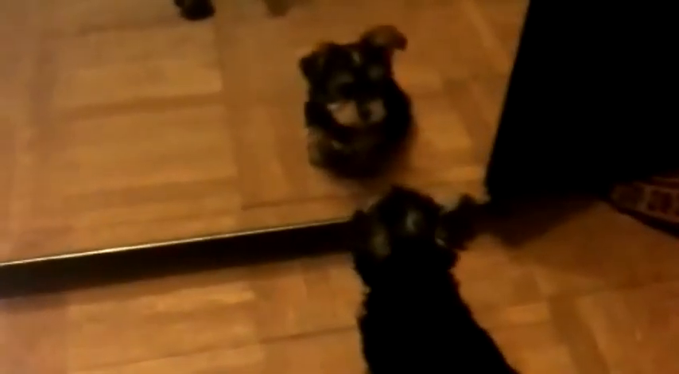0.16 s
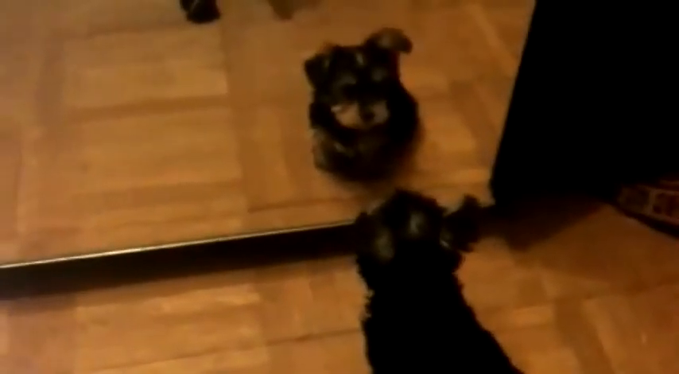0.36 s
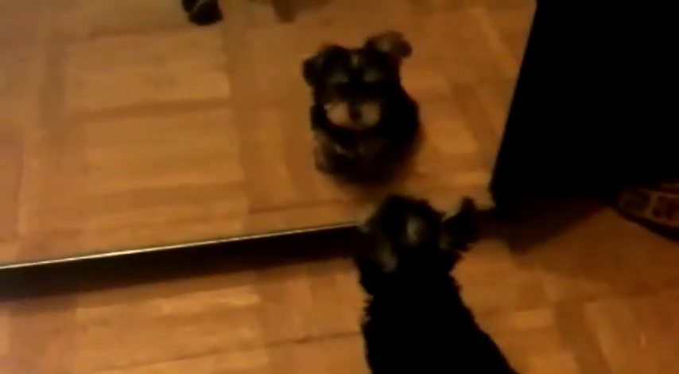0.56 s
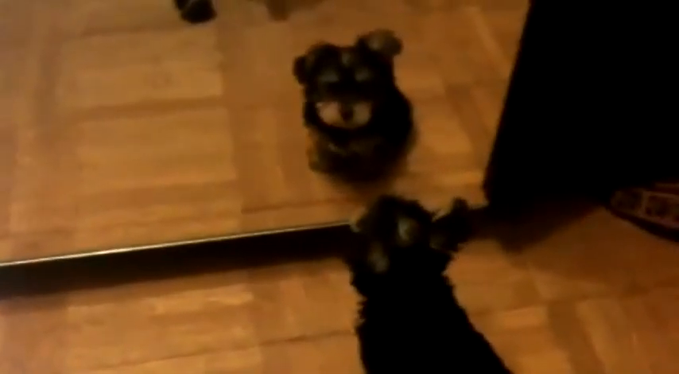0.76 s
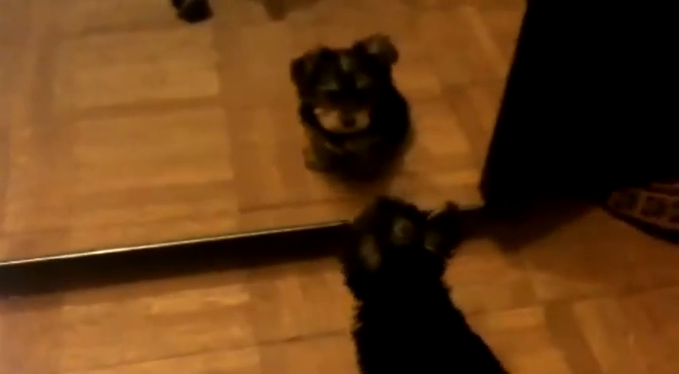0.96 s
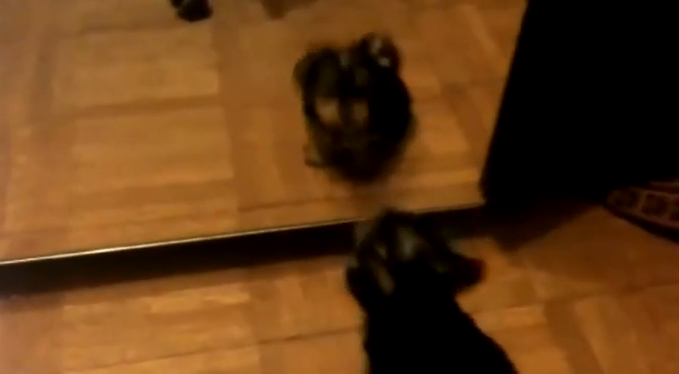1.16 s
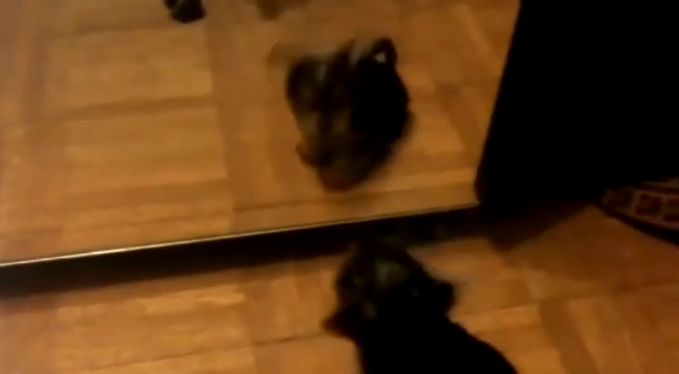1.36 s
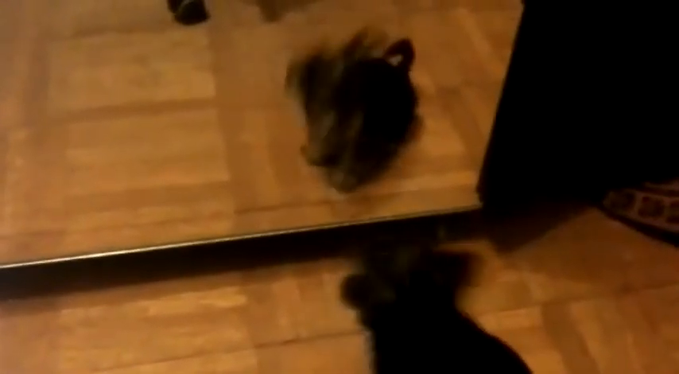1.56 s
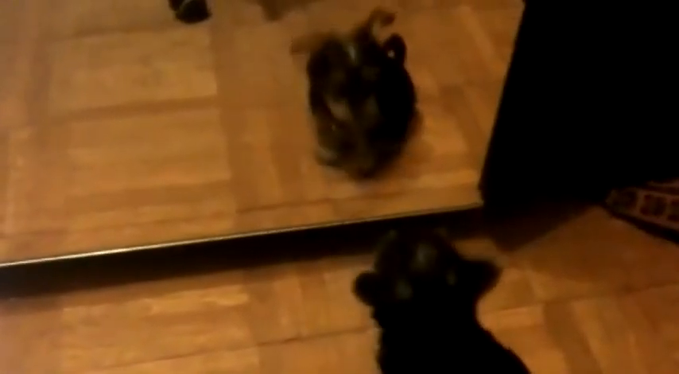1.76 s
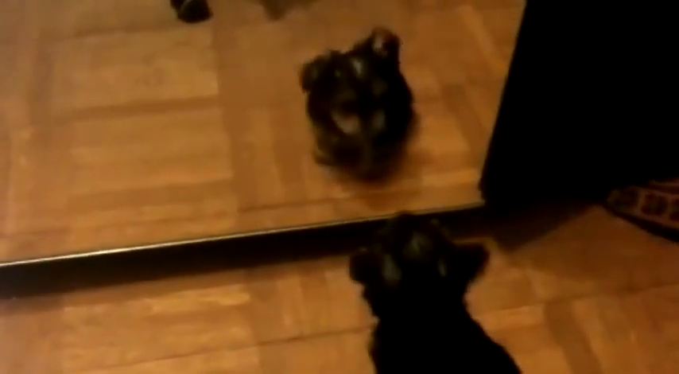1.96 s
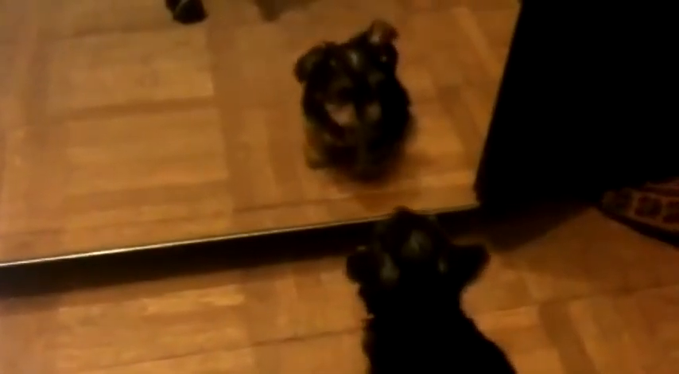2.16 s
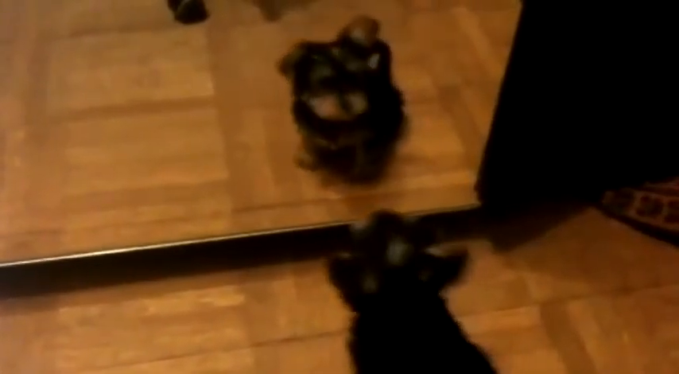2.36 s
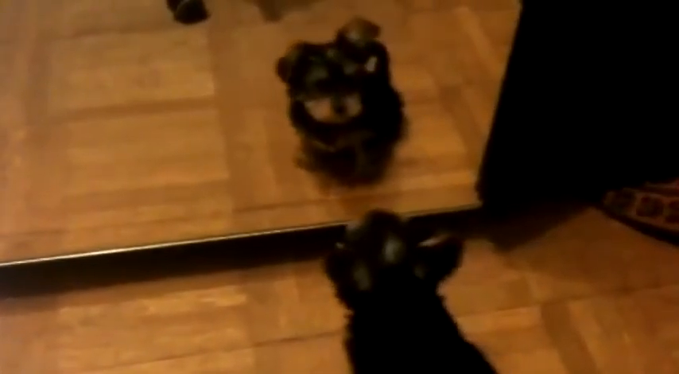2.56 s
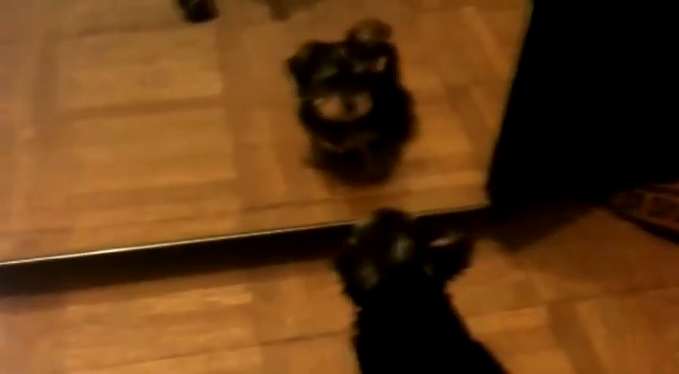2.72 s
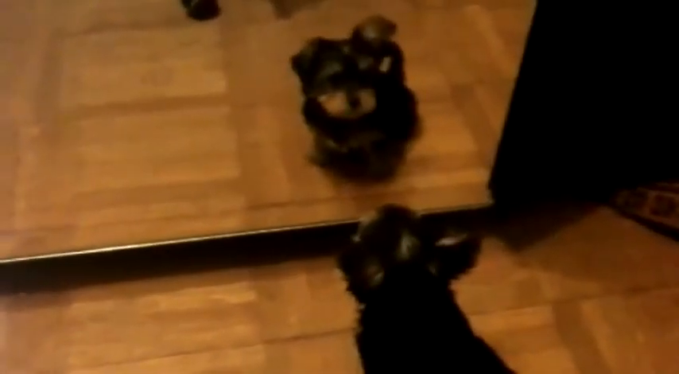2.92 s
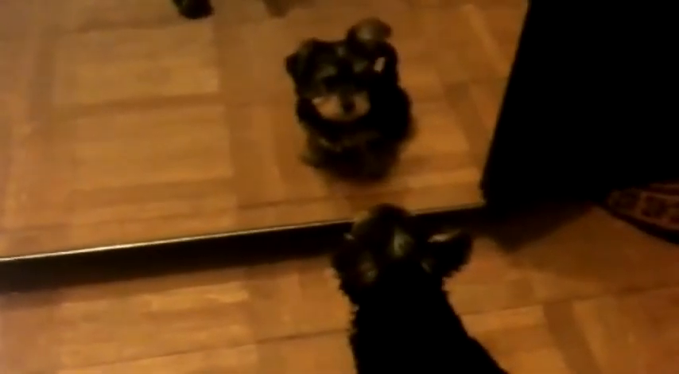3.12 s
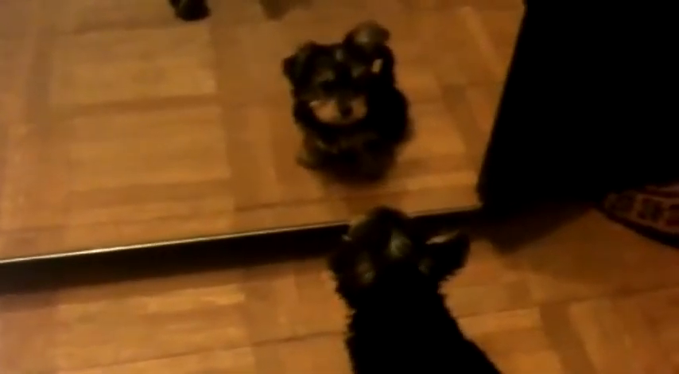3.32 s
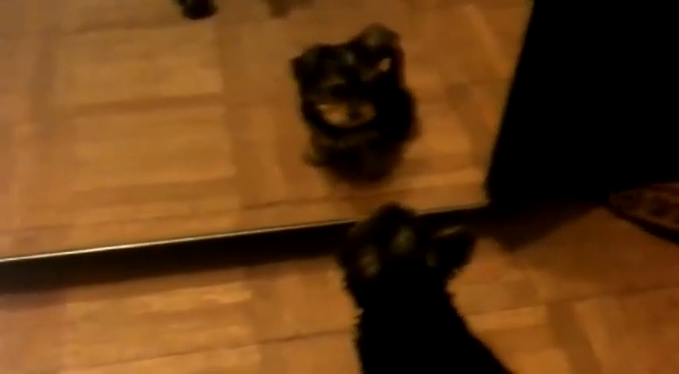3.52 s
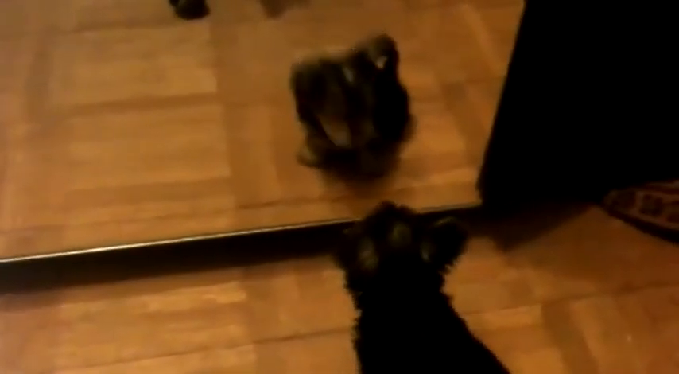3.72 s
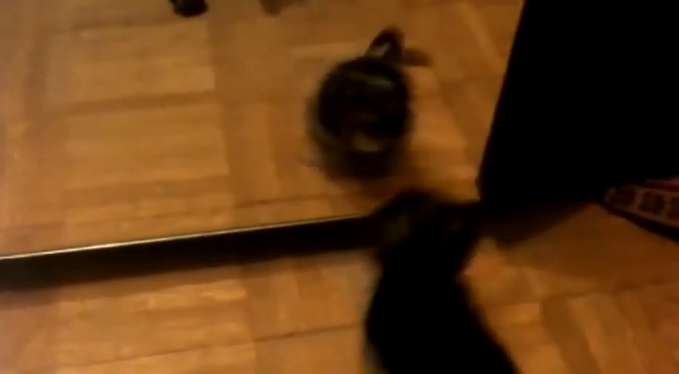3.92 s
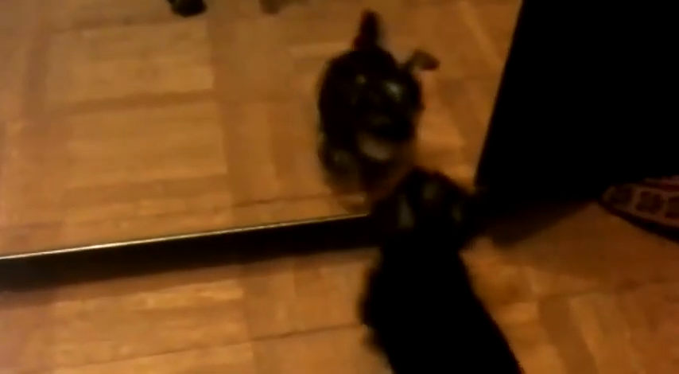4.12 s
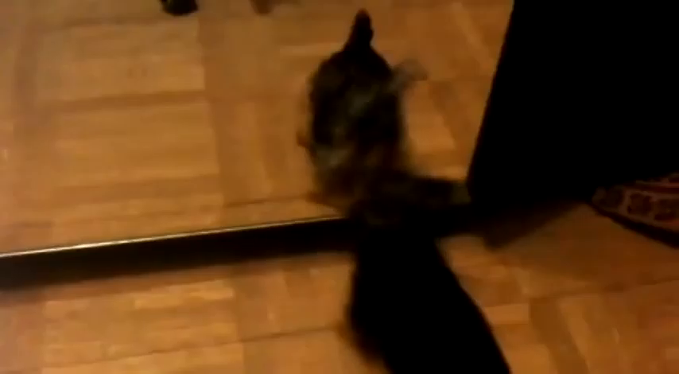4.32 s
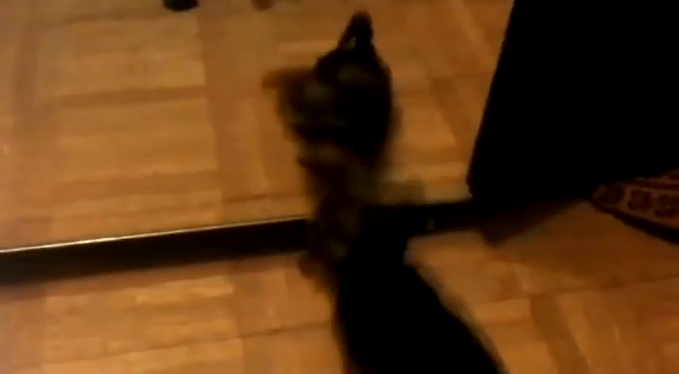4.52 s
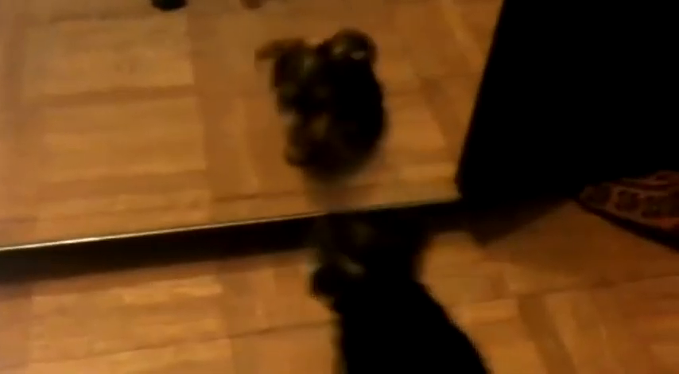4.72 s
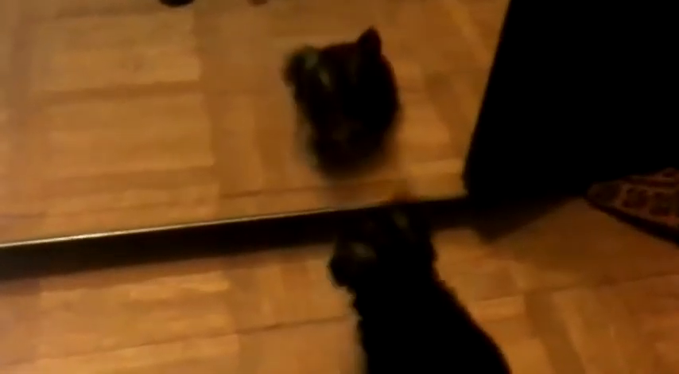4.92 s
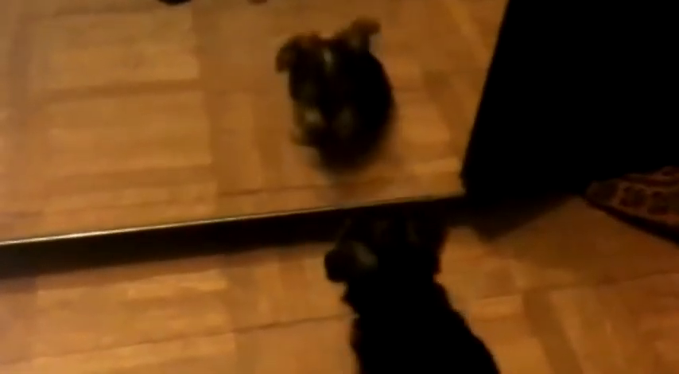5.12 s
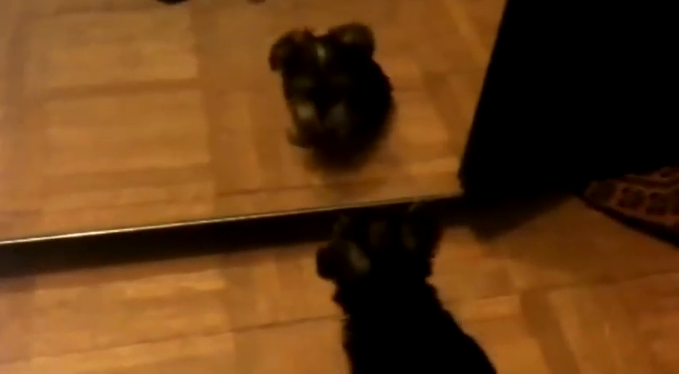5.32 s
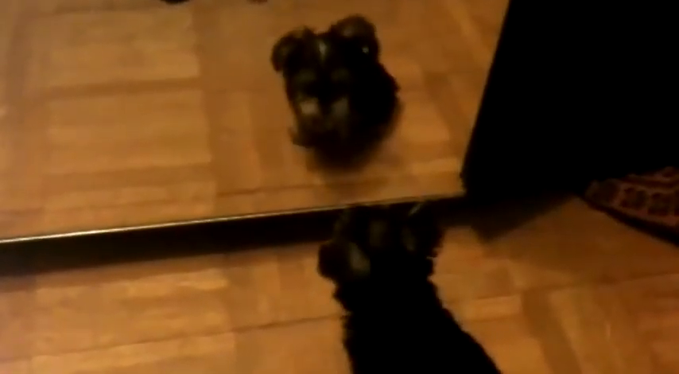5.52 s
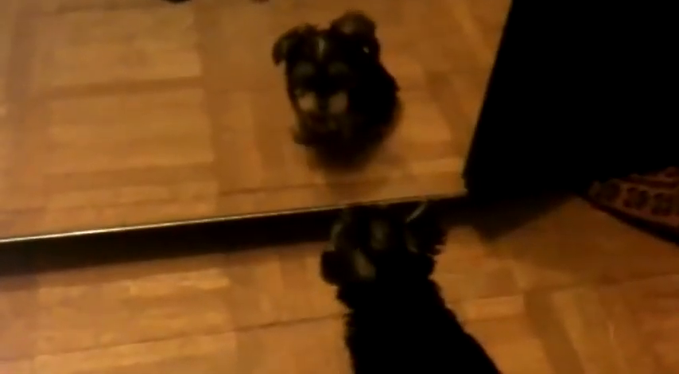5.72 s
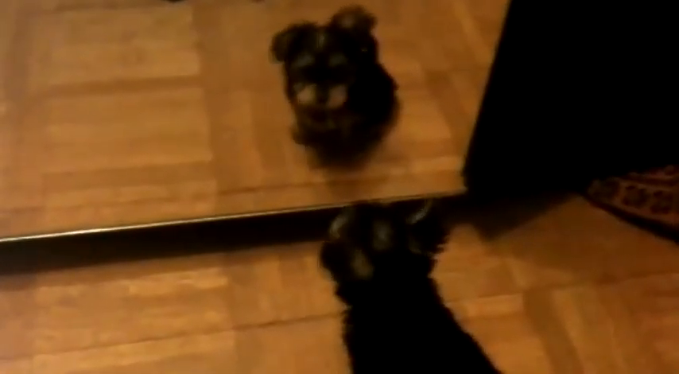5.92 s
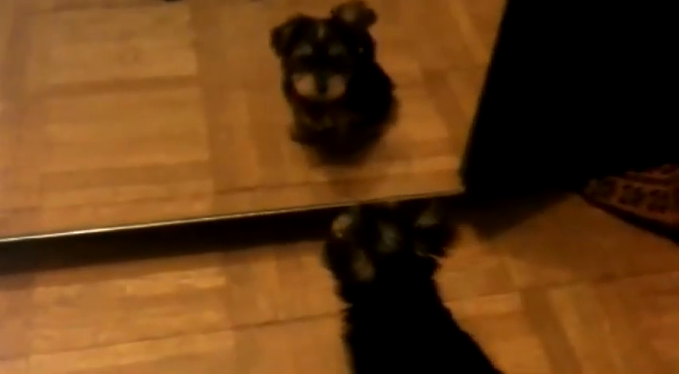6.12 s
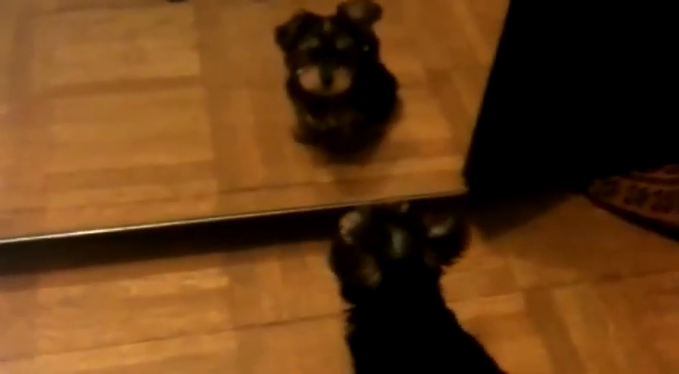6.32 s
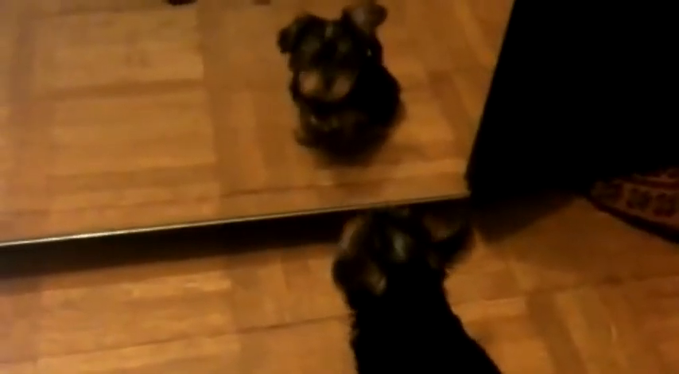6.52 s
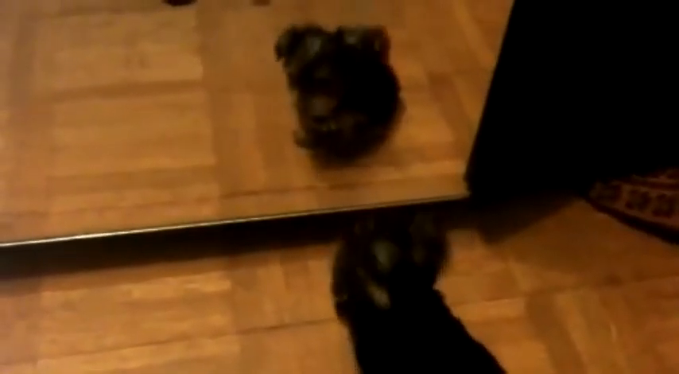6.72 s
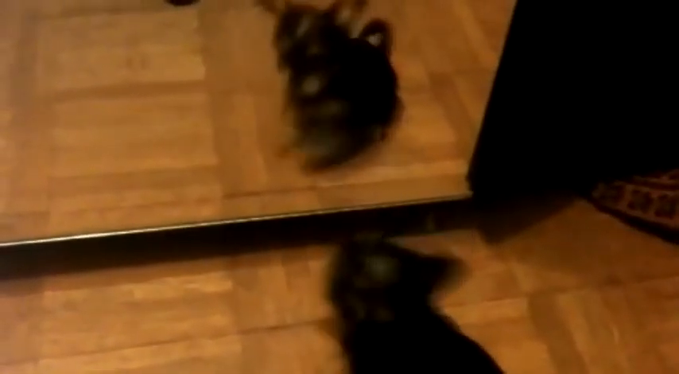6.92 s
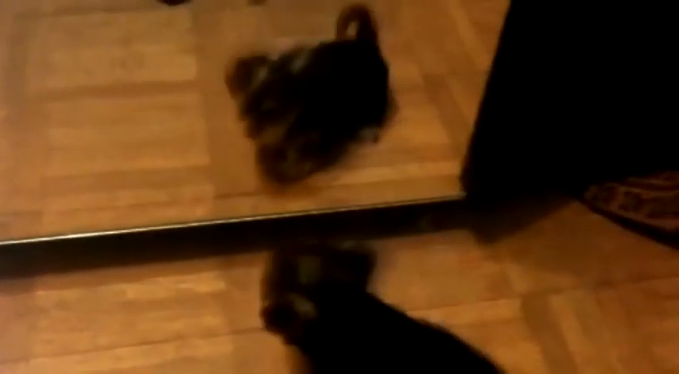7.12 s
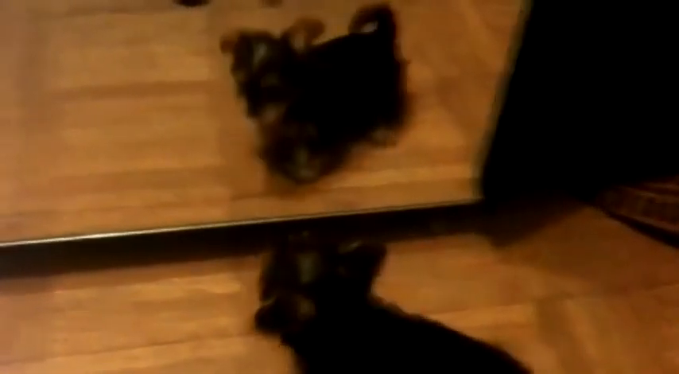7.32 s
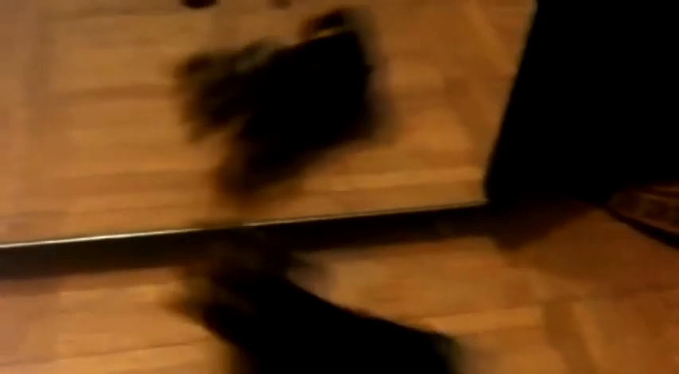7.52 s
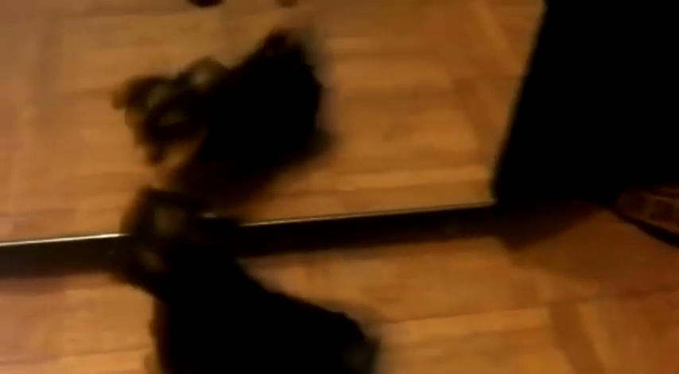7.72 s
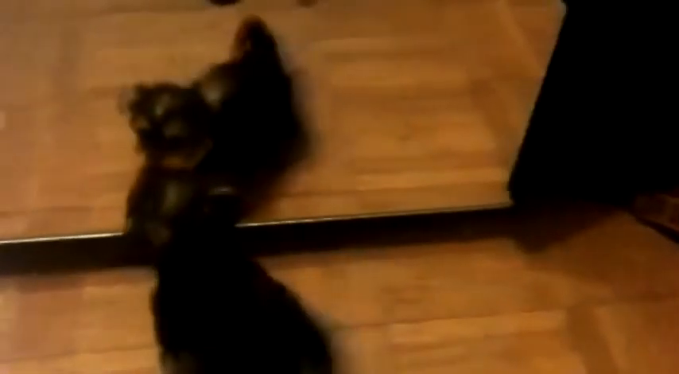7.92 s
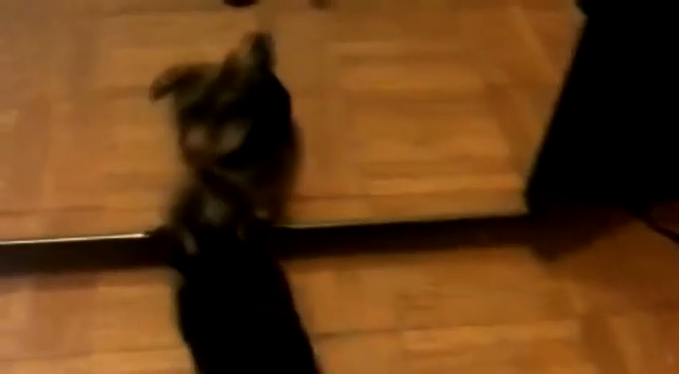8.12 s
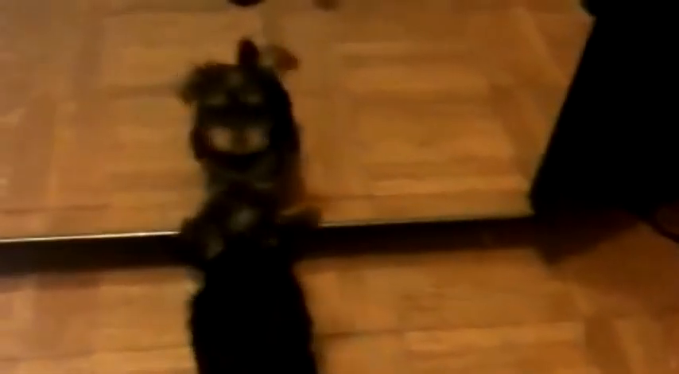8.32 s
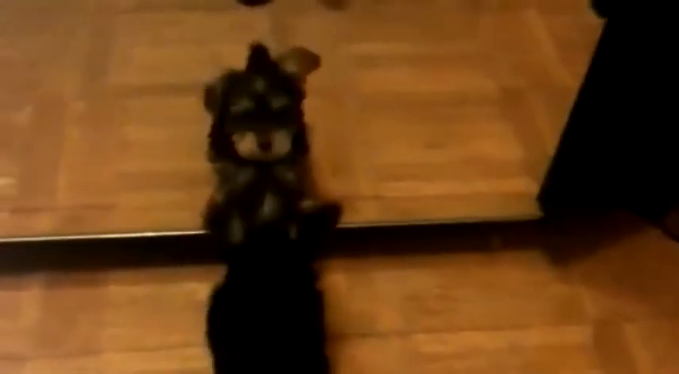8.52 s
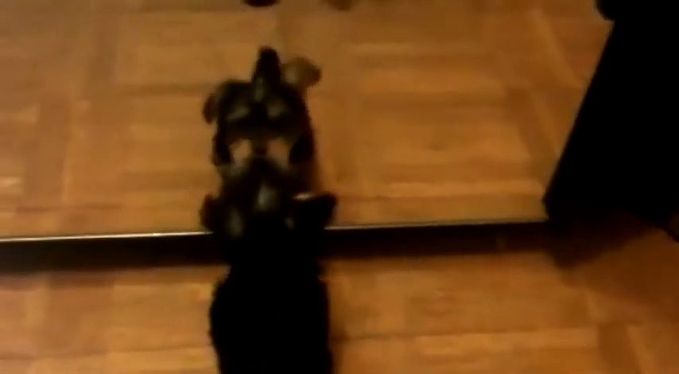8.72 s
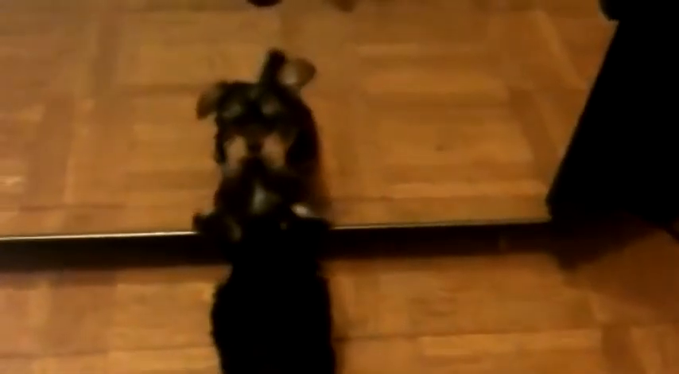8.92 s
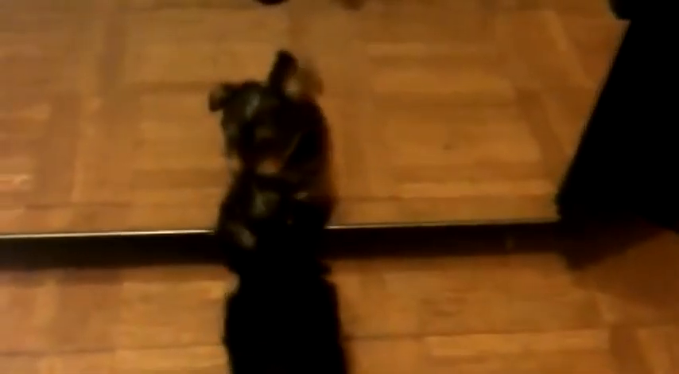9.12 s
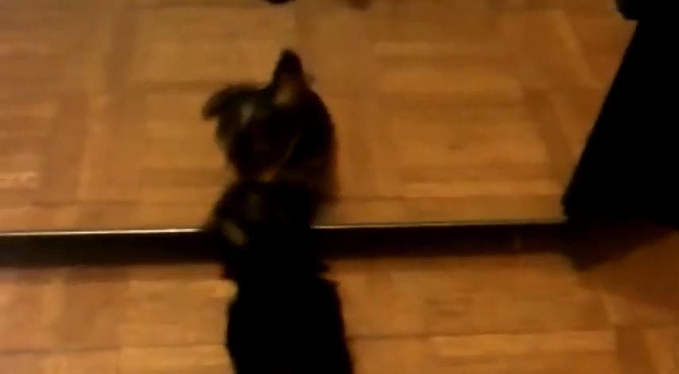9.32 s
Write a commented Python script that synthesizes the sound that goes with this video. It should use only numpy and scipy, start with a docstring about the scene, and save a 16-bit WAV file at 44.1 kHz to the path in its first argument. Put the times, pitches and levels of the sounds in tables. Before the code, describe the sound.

A small puppy gives short high yips, squeaks and nasal whines in bursts, with one loud sharp yap, in an echoing wooden-floored room.

```python
"""A small puppy yips and whines at another dog, over the wooden floor of a live room, with one loud yap.
Each note is a near-pure high sine with weaker overtones and a rasp of air; squeaks fall quickly in pitch.
Around the yips, shaped noise hisses through the nose and thin swept sines whistle above it.
Paws thud softly three times as decaying low sines. Echoes of the room follow the dog; an appliance's
wavering tones and steady room noise lie underneath, without added echo."""
import sys
import numpy as np
from scipy import signal
from scipy.fft import rfft, irfft, next_fast_len
from scipy.io import wavfile
from scipy.ndimage import uniform_filter1d

SR = 44100
rng = np.random.default_rng(int(sys.argv[2]) if len(sys.argv) > 2 else 0)


def pcm_store(signal):
    """Save signal as 16-bit PCM."""
    levels = np.round(np.clip(np.atleast_2d(signal), -1, 1) * 32767)
    wavfile.write(sys.argv[1], SR, levels.astype(np.int16).T)


N = 412776

# Steady tones of the appliance: f/Hz, relative level/dB
HUM_TONES = [(199.2, -64.5), (274.5, -64), (333.8, -61), (382.2, -66), (511.4, -62.5), (667.5, -75),
             (791.3, -70.5), (904.4, -72.5), (1017, -69.5)]
# Colour of the room noise: f/Hz, relative density/dB per Hz
ROOM_NOISE = [(18, -89), (30, -53), (123, -13.5), (197, 2), (225, -5), (277, 3.5), (299, -10), (324, -6),
              (359, -8), (505, -3.5), (546, -10.5), (1020, -11.5), (1440, -12.5), (1680, -16), (15500, -29)]
# Nose whistles: start t/s, length t/s, first f/Hz, last f/Hz, peak level/dB
WHISTLES = [(.293, .04, 14150, 15000, -55), (1.057, .045, 12200, 13800, -56.5),
            (1.354, .03, 12000, 13300, -55), (2.188, .12, 13950, 13050, -50),
            (2.765, .15, 13100, 12700, -50), (3.376, .09, 12700, 13600, -52),
            (3.766, .04, 12000, 12500, -54), (3.84, .08, 14100, 13650, -50.5),
            (4.46, .036, 11250, 12050, -50.5), (4.914, .044, 12000, 13150, -53),
            (6.39, .086, 13000, 14300, -56)]
# Whimpers of air through the nose: strongest t/s, length of the swell t/s, level at the strongest/dB
WHIMPERS = [(.47, 0.087, -54.5), (1.15, 0.052, -48.5), (1.54, 0.22, -54), (1.88, 0.21, -50.5),
            (2.29, 0.22, -52), (2.86, 0.4, -57.5), (3.401, 0.092, -52), (3.9, 0.13, -55), (4.23, 0.17, -52),
            (4.631, 0.17, -49), (5.05, 0.18, -51.5), (5.56, 0.27, -54.5), (6.42, 0.23, -56),
            (7.24, 0.26, -56.5), (7.57, 0.17, -49.5), (7.93, 0.21, -51.5), (8.2, 0.045, -53),
            (9.13, 0.095, -62)]
# Colour of the nose air: f/Hz, relative density/dB per Hz
NOSE_AIR = [(1000, -15.5), (2800, -7), (3900, -47.5), (5000, -3.5), (7000, -8), (8400, 5), (9200, 2),
            (10300, -1.5), (11200, 1.5), (12100, -7), (13200, -8.5), (14300, -13.5), (15500, -66.5)]
# How throat and mouth pass the overtones, and the colour of the rasp: f/Hz, gain/dB
THROAT = [(1700, 2), (2200, -5.5), (2700, -24), (3300, -17), (3800, -28.5), (4300, -16), (4700, -16),
          (5300, -16), (6100, -18.5), (6900, -25), (7600, -22.5), (8400, -13.5), (9200, -18.5),
          (10100, -28), (11200, -30.5), (14000, -38.5)]
# Colour of the hoarse air in a broken voice: f/Hz, relative density/dB per Hz
HOARSE_AIR = [(1500, -34.5), (3000, -6), (3600, -4.5), (4300, 2), (5000, -1), (5600, -16), (6500, 1),
              (8600, -1.5), (10200, -10.5), (14000, -15)]
# Sharp yaps and bending whines, one curve each:
# t/s, f/Hz, level/dB, overtones/dB, open mouth/dB, roughness/0-1
SWOOPS = [
    [(1.101, 2610, -40, 0, 0, 0.27), (1.113, 2502, -26, 8, -1, 0.2), (1.122, 2518, -14.5, -5.5, 13.5, 0.02),
     (1.133, 2541, -19.5, -6, 17, 0.38), (1.145, 2720, -30.5, 0.5, 20, 0.37),
     (1.158, 2654, -17.5, -15, 16, 0), (1.170, 2500, -33, -5, 10, 0.1)],
    [(1.384, 2550, -15, -14, 10, 0.05), (1.392, 2380, -13.5, -1.5, 18, 0), (1.400, 2240, -19.5, 5, 12, 0.1),
     (1.408, 2334, -13, -2, 8.5, 0.1), (1.418, 2483, -10, -11.5, 14.5, 0), (1.428, 2650, -38, -9, 15, 0.42),
     (1.440, 2607, -26, -5, 4, 0.14), (1.485, 2602, -37.5, 11, 1, 0), (1.530, 2610, -48, 15.5, 5, 0),
     (1.552, 2480, -43, 9, 5, 0.1)],
    [(2.279, 1980, -31, -8, 0, .4), (2.288, 1930, -34, -13, 2, 0), (2.298, 1873, -23.5, -21, 6, 0),
     (2.305, 1832, -19.5, -16.5, 15, 0.3), (2.310, 1530, -33, -14, 0, .4), (2.316, 1370, -46, -16, 0, 0.5)],
    [(4.521, 2027, -16, -15, 0, 0), (4.545, 1940, -20.5, -11, -8, 0.02), (4.585, 1853, -20.5, -8, 12, 0),
     (4.626, 1856, -25, -11, 0, 0), (4.645, 1723, -21, -11, 15, .02), (4.658, 1610, -26, -9, 12, .05),
     (4.672, 1320, -34, -26, -7, .2)],
    [(4.954, 2050, -25, -5, 0, 0.56), (4.966, 1808, -32.5, 3, 4, 0.25),
     (4.980, 1700, -31.5, 3.5, 13.5, 0.2), (5.001, 1932, -30.5, 2, 3, 0.07), (5.033, 1867, -30.5, -3, 1, 0),
     (5.047, 1665, -33.5, -3, 1, 0.35), (5.060, 1613, -29, -7, 3.5, 0.25), (5.075, 1325, -35, -8, -1, .3)],
    [(5.450, 1510, -48, 0, 0, .2), (5.463, 1598, -34.5, -1, -2, 0), (5.484, 1585, -32.5, -5, 2, 0),
     (5.497, 1315, -24, -10, 3, .1), (5.530, 1263, -25, -9.5, -5, 0.14), (5.558, 1214, -29, -5.5, 1, .05),
     (5.585, 1216, -33, -5.5, -5, 0), (5.600, 1130, -43, 0, -4, 0.35)],
    [(6.747, 2090, -17, 1, 8, 0.42), (6.756, 2023, -4, -9, 8, 0), (6.768, 2077, -9, -11, 11, 0.07),
     (6.777, 2208, -19, 7.5, 4, 0.62), (6.784, 2338, -17, -4, 13.5, 0.48),
     (6.796, 2482, -14, -9.5, 11.5, 0.31), (6.809, 2498, -26, -14, 8, 0.46),
     (6.835, 2432, -32.5, -1, 14, 0.62), (6.880, 2314, -39.5, 2, 7, 0.76)],
    [(7.126, 2400, -42, 5, 3, 0.4), (7.149, 2130, -23.5, -6, 2, 0.25), (7.168, 2388, -33, -2.5, 6, 0.33),
     (7.205, 2308, -29, -7, 6, 0.3), (7.235, 2247, -33.5, -6, 8, 0.46), (7.249, 2160, -36, -2, 2, 0.4)],
    [(7.463, 2203, -36, 4, 8, .3), (7.477, 2220, -28, -9, 10, 0.25), (7.491, 2090, -20.5, -5, 8, 0.14),
     (7.501, 2119, -16.5, -12, 18.5, 0), (7.513, 2218, -25.5, -6.5, 15.5, 0.02),
     (7.530, 2193, -33, -10, 10, 0.13), (7.549, 2140, -32, -8, 8, .4)],
    [(7.818, 1805, -47, 11, -1, 0.7), (7.831, 1725, -23, -13, 12, 0.36),
     (7.885, 1706, -24, -12.5, 14.5, 0.02), (7.915, 1637, -27.5, -13, 13, 0.11),
     (7.952, 1604, -32, -4, 15, .15)],
    [(8.155, 1266, -28, -20, 0, 0.6), (8.165, 1118, -27, -19, 5, 0.6), (8.177, 1072, -22, -13, 11.5, 0),
     (8.195, 1077, -22.5, -18, 3, 0.05), (8.218, 1139, -34.5, -7, -4, 0.46),
     (8.245, 1081, -32, -15, -4, 0.4), (8.265, 1083, -41, -9, -4, .4), (8.277, 1045, -36, -3, 0, .9),
     (8.289, 1010, -46, -10, 0, .6)],
]
# Squeaks, quick drops in pitch:
# start t/s, length t/s, first f/Hz, drop/octaves, level/dB, overtones/dB, open mouth/dB
SQUEAKS = [ (1.166, 0.024, 2280, 0.42, -26, -19, 0), (1.552, 0.021, 1960, 0.46, -25.5, -17, 6),
           (1.875, 0.028, 2018, 0.5, -19.5, -15, 6.5), (2.874, 0.016, 1625, 0.43, -40.5, -19, 2),
           (3.908, 0.011, 1670, 0.36, -37.5, -6, 1), (4.248, 0.019, 1965, 0.57, -25, -13, -1),
           (6.42, 0.047, 1764, 0.2, -52.5, -11, 2), (6.89, 0.021, 2010, 0.33, -36, -10, -4),
           (7.246, 0.023, 1873, 0.4, -23.5, -11, 3), (7.545, 0.031, 1920, 0.31, -19.5, -10.5, 7),
           (7.951, 0.023, 1544, 0.35, -31.5, -6, -6), (8.31, 0.013, 887, 0.21, -30, -20, -6),
           (9.126, 0.022, 1312, 0.356, -36.5, -3.5, -7), ]
# Plain held notes: start t/s, length t/s, attack t/s, first f/Hz, last f/Hz, level/dB,
# level change along the note/dB, height of the opening push t/s after the start,
# sag of its pitch/0-1, its gain/dB, overtones/dB, open mouth/dB
CRIES = [ (1.761, 0.12, 0.012, 2140, 2120, -25, -6, 0.03, 0.03, 4.5, -2, 9),
         (4.136, 0.099, 0.023, 2550, 2347, -43, 7, 0.025, 0.08, 8.5, 4, 3.5),
         (4.494, 0.062, 0.0098, 2300, 2170, -46, -11, 0.023, 0.05, 9, 10.5, -6),
         (7.965, 0.041, 0.0037, 1693, 1716, -33.5, 7, 0.009, 0.05, -1.5, -13.5, -13),
         (8.296, 0.029, 0.0038, 952, 915, -28.5, -10, 0.0046, 0.01, 0, -15.5, 4), ]
# Paws landing on the floor: t/s, level before the soft rise/dB, thud f/Hz
PAWS = [(4.327, -31, 188), (7.936, -38, 176), (8.098, -39, 159)]
# How long the room rings: f/Hz, decay by 60 dB t/s
RING = [(200, 0.6), (1200, 0.4), (1750, 0.46), (2300, 0.53), (5000, 0.38), (9000, 0.32), (15000, 0.057)]

EDGE_HZ = 15600  # upper band limit
MOUTH_HZ, MOUTH_WIDTH_HZ = 4970, 850  # resonance of the open mouth
WHIMPER_FALL_S = 0.0662
RELEASE_S = 0.0042  # closing ramp of a cry, both ramps of a swoop
PUSH_END_S = 0.039  # the push has eased well off by this time into the cry
PUSH_SHARPNESS = 2.7  # its loudness goes sooner than its sag
OVERTONE_SHARE = 0.99  # the overtones follow this share of a cry's changes in dB
LEVEL_CURVE = 0.97  # exponent: the level of a cry changes almost evenly in dB
SCOOP, SCOOP_S = 0.0693, 0.0036  # a cry starts sharp by this share and falls into its note
DROOP, DROOP_S = 0.0505, 0.0115  # its pitch droops by this share as it runs out
DROP_CURVE = 2.1  # the drop of a squeak speeds up as the breath gives out
SQUEAK_ARCH = 1.6  # how pointed its swell is
CRY_ROUGH, SQUEAK_ROUGH = .15, .35  # roughness 0-1
HOARSE_CURVE = 1.7  # a slightly rough voice stays clear; hoarse air comes in as it really breaks


def gain_of(db):
    """Decibels to a factor."""
    return 10 ** (np.asarray(db) / 20)


def evened(x):
    """Scales to an rms of 1."""
    return x / np.sqrt(np.mean(x ** 2) + 1e-20)


def read(points, hz):
    """Reads a curve along a log-frequency axis."""
    f, value = np.transpose(points)
    return np.interp(np.log(hz + 1), np.log(f + 1), value)


def add(mix, s, sound):
    """Mixes a sound in at s seconds."""
    part = mix[round(s * SR):][:len(sound)]
    part += sound[:len(part)]


def span(start, end):
    """The sample numbers between two times."""
    return np.arange(round(start * SR), round(end * SR))


def noise(spectrum):
    """Noise with the given spectrum and an rms of 1."""
    size = next_fast_len(N, real=True)
    white = rfft(rng.standard_normal(size))
    colour = gain_of(read(spectrum, np.fft.rfftfreq(size, 1 / SR)))
    return evened(irfft(white * colour, size)[:N])


def drift(rate_hz):
    """Random wandering, mostly slower than the given rate, with an rms of 1."""
    pole = np.exp(-2 * np.pi * rate_hz / SR)
    return evened(signal.lfilter([1], [1, -2 * pole, pole ** 2], rng.standard_normal(N)))


def background(hum_db=-1, noise_db=-53.5, waver=0.39):
    """Appliance tones, their phase wavering slightly, in the steady noise of the room."""
    t = np.arange(N) / SR
    hum = np.zeros(N)
    for hz, db in HUM_TONES:
        phase = 2 * np.pi * (hz * t + rng.random()) + waver * drift(0.33)
        hum += gain_of(db) * np.sqrt(2) * np.sin(phase)
    return gain_of(hum_db) * hum + gain_of(noise_db) * noise(ROOM_NOISE)


def whistles(jitter=0.0076):
    """The narrow nostrils whistle on an unsteady, very high note."""
    out, wobble = np.zeros(N), drift(600)
    for s, length, first_hz, last_hz, db in WHISTLES:
        at = span(s, s + length)
        hz = np.linspace(first_hz, last_hz, len(at)) * (1 + jitter * wobble[at])
        tone = np.sin(2 * np.pi * np.cumsum(hz) / SR)
        out[at] += gain_of(db) * signal.windows.tukey(len(at), .5) * tone
    return out


def whimpers(start_db=-14, end_db=-12, flutter_db=4.5):
    """Air hisses through the nose, each breath swelling and then dying away, its level fluttering."""
    blow = np.zeros(N)
    for s, swell, db in WHIMPERS:
        at = span(s - swell, s + WHIMPER_FALL_S)
        shape_db = np.interp(at / SR - s, [-swell, 0, WHIMPER_FALL_S], [start_db, 0, end_db])
        blow[at] += gain_of(db + shape_db) * signal.windows.tukey(len(at), .2)
    return blow * noise(NOSE_AIR) * gain_of(flutter_db * drift(26))


def swoop(points):
    """A yap or whine that swoops through several pitches on one breath."""
    s, *controls = np.transpose(points)
    at = span(s.min(), s.max())
    # a short average rounds the corners of each curve
    curves = [uniform_filter1d(np.interp(at / SR, s, c), size=130) for c in controls]
    hz, db, press_db, mouth_db, rough = curves
    edge_s = np.minimum(at - at[0], at[-1] - at) / SR
    gate = np.minimum(edge_s / RELEASE_S, 1)
    return at, hz, gate * gain_of(db), press_db, mouth_db, np.clip(rough, 0, 1)


def squeak(start, length, first_hz, drop, db, press_db, mouth_db):
    """The folds slacken: the pitch falls ever faster under one short swell."""
    at = span(start, start + length)
    u = np.linspace(0, 1, len(at))
    swell = abs(np.sin(np.pi * u)) ** SQUEAK_ARCH
    hz = first_hz * 2 ** (-drop * u ** DROP_CURVE)
    return at, hz, gain_of(db) * swell, press_db, mouth_db, SQUEAK_ROUGH


def cry(start, length, attack, first_hz, last_hz, db, change_db, push_s, sag, push_db, press_db, mouth_db):
    """A held note: an opening push of breath bends its level and flattens it; it slides on and droops."""
    at = span(start, start + length)
    t = (at - at[0]) / SR
    push = np.exp(-((t - push_s) / max(PUSH_END_S - push_s, .005)) ** 2)
    bend = SCOOP * np.exp(-t / SCOOP_S) - sag * push - DROOP * np.exp((t - length) / DROOP_S)
    hz = (first_hz + (last_hz - first_hz) * t / length) * (1 + bend)
    swell_db = change_db * (t / length) ** LEVEL_CURVE + push_db * push ** PUSH_SHARPNESS
    ramp = np.clip(np.minimum(t / attack, (t[-1] - t) / RELEASE_S), 0, 1)
    gate = np.sin(np.pi / 2 * ramp) ** 2
    press_db = press_db - (1 - OVERTONE_SHARE) * swell_db
    return at, hz, gate * gain_of(db + swell_db), press_db, mouth_db, CRY_ROUGH


def throat_db(hz, mouth_db):
    """The throat's colour, with the resonance that rings out when the mouth opens."""
    return read(THROAT, hz) + mouth_db * np.exp(-((hz - MOUTH_HZ) / MOUTH_WIDTH_HZ) ** 4)


def yips(jitter=0.0032, break_jitter=0.038, quaver=0.0082,  # shares of the pitch
         break_glide=22, glide_rough=0.72,  # octaves/s, roughness 0-1
         blur=0.043, break_blur=0.22,  # phase/rad
         shimmer=0.028, tremble_db=0.5, uneven_db=3.5,
         overtones_db=2, break_db=-1, rasp_db=-28, rasp_low_hz=2300, hoarse_db=-4.0):
    """Tiny vocal folds give a strong fundamental; the throat colours their overtones and the rasp of air."""
    out = np.zeros(N)
    wobble, flutter, scatter, unsteady = drift(270), drift(120), drift(320), drift(24.6)
    rasp_band = signal.butter(3, rasp_low_hz, "highpass", fs=SR, output="sos")
    air = signal.sosfilt(rasp_band, noise(THROAT))
    hoarse = gain_of(hoarse_db) * noise(HOARSE_AIR)
    # each of 11 overtones swells and fades by itself
    uneven = [gain_of(uneven_db * drift(24)) for _ in range(11)]
    notes = [swoop(points) for points in SWOOPS]
    notes += [cry(*row) for row in CRIES]
    notes += [squeak(*row) for row in SQUEAKS]
    for at, hz, level, press_db, mouth_db, rough in notes:
        # the voice breaks up under strain and where its pitch slides fast
        glide = uniform_filter1d(abs(np.gradient(np.log2(hz))) * SR, size=200)
        broken = np.maximum(rough, glide_rough * np.tanh((glide / break_glide) ** 2))
        torn = np.clip(broken, 0, 1) ** HOARSE_CURVE
        hz = hz * (1 + (jitter + break_jitter * broken) * wobble[at] - quaver * unsteady[at])
        phase = 2 * np.pi * np.cumsum(hz) / SR
        # the folds close a little early or late, which smears the higher overtones most
        closing = phase + (blur + break_blur * torn) * scatter[at]
        overtones = np.zeros(len(at))
        for k, swell in enumerate(uneven, 2):
            strength = gain_of(throat_db(k * hz, mouth_db)) * (k * hz < EDGE_HZ)
            overtones += strength * swell[at] * np.sin(k * closing)
        rasp = gain_of(rasp_db) * air[at] + torn * hoarse[at]
        edge = gain_of(overtones_db + break_db * broken) * overtones + rasp
        voice = np.sin(phase) + gain_of(press_db) * edge
        tremble = gain_of(tremble_db * unsteady[at]) * (1 + shimmer * flutter[at])
        out[at] += level * tremble * voice
    return out


def paws(t60=0.086, rise=0.014, low_ratio=0.64, low_db=-14, claw_db=-19, claw_t60=0.05):
    """A soft pad pushes the boards into a dull thud with a lower mode under it, and a claw ticks on them."""
    out, t = np.zeros(N), np.arange(SR // 2) / SR
    for s, db, hz in PAWS:
        low_mode = gain_of(low_db) * np.sin(2 * np.pi * low_ratio * hz * t)
        boards = np.sin(2 * np.pi * hz * t) + low_mode
        thud = boards * (1 - np.exp(-t / rise)) * gain_of(-60 * t / t60)
        claw = rng.standard_normal(len(t)) * gain_of(claw_db - 60 * t / claw_t60)
        add(out, s, gain_of(db) * (thud + claw))
    return out


def room(x, wet_db=-4, treble_db=2.5, first_s=0.009, walls_db=4.5, walls_s=0.019, walls_spread_s=0.013):
    """Echoes of random sign, from furniture, then stronger from the walls; each band dies at its own speed."""
    slots = np.arange(0, SR - 20, 20)
    taps = np.zeros(SR)
    taps[slots + rng.integers(0, 20, len(slots))] = rng.choice([-1., 1.], len(slots))
    hz, t, bands = signal.stft(taps, SR, nperseg=256)
    walls = walls_db * np.exp(-((t - walls_s) / walls_spread_s) ** 2)
    decay = gain_of(-60 * t / read(RING, hz)[:, None] + walls)
    # the muzzle beams the treble past the microphone, so more of it arrives as echo
    beam = gain_of(read([(2500, 0.011), (5000, treble_db)], hz))[:, None]
    tail = signal.istft(bands * decay * beam, SR, nperseg=256)[1]
    echoes = np.zeros(N)
    add(echoes, first_s, signal.fftconvolve(x, tail / np.linalg.norm(tail)))
    return x + gain_of(wet_db) * echoes


def scene():
    """The puppy in the live room, over the hum, on one microphone channel."""
    puppy = yips() + whimpers() + whistles() + paws()
    return (room(puppy) + background())[None]


def record(dry):
    """The recorder's band limit, a steep low-pass."""
    low_pass = signal.firwin(511, EDGE_HZ, window=("kaiser", 9), fs=SR)
    return signal.oaconvolve(dry, low_pass[None], "same")


dry = scene()
out = record(dry)
pcm_store(out)
```